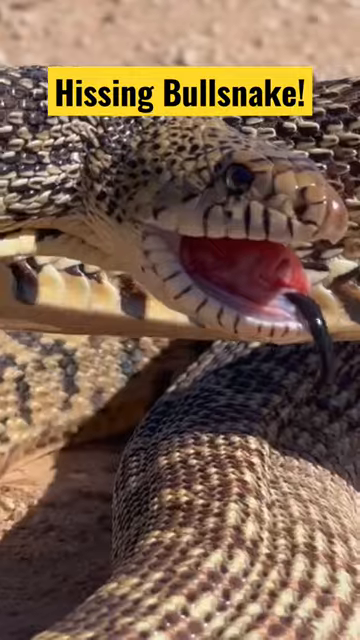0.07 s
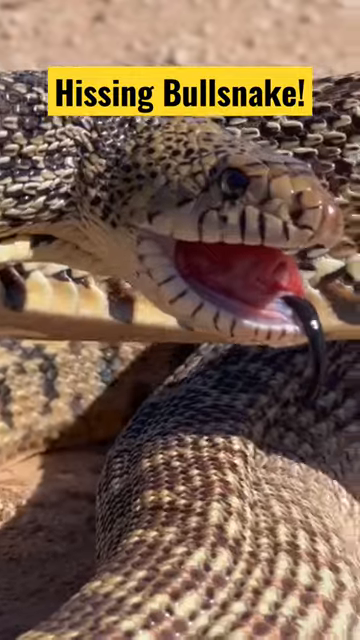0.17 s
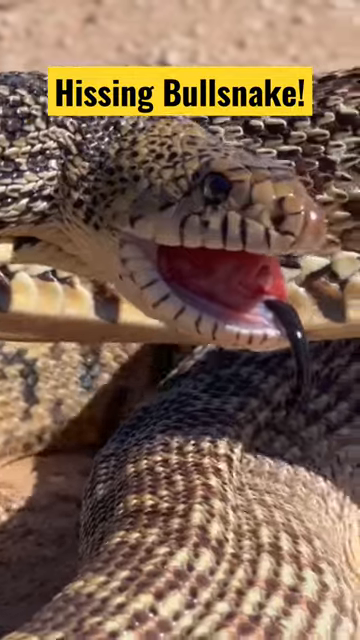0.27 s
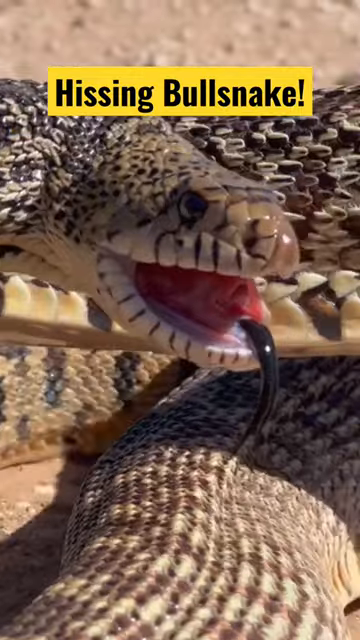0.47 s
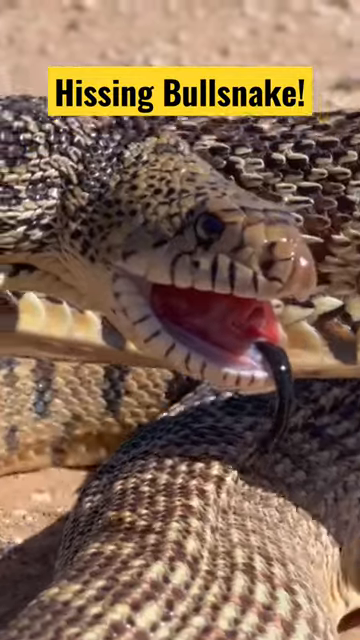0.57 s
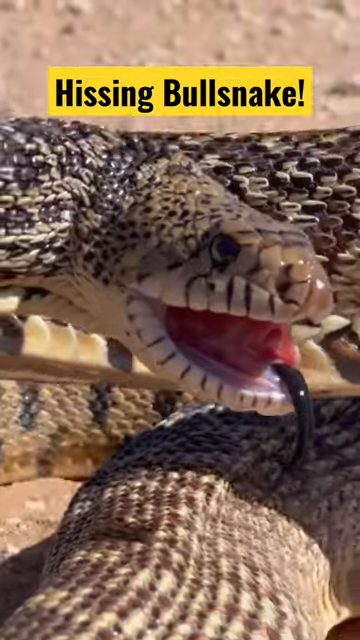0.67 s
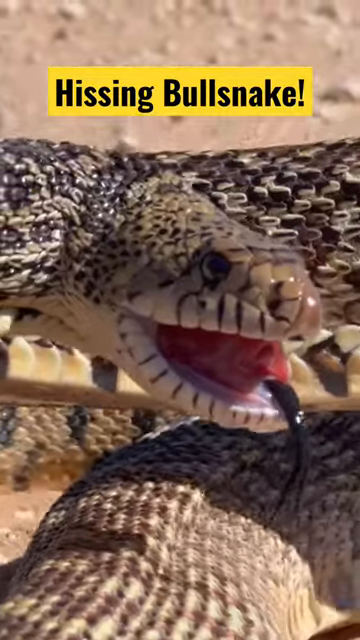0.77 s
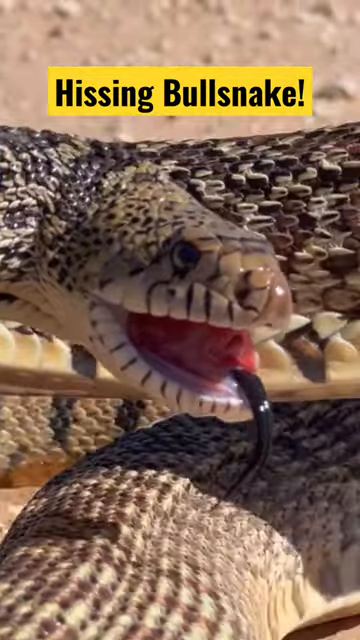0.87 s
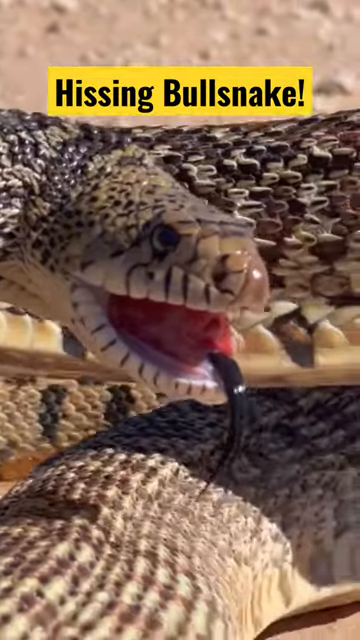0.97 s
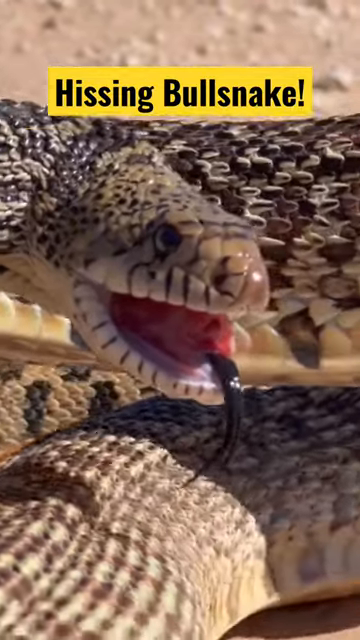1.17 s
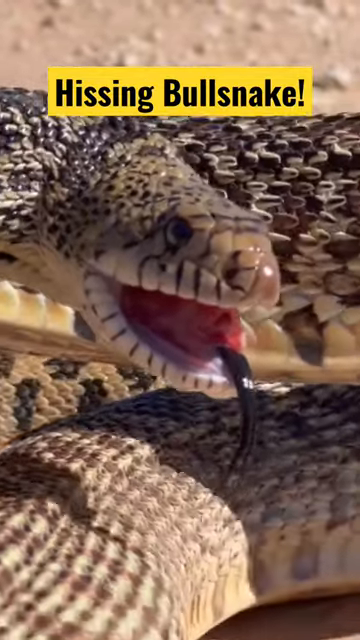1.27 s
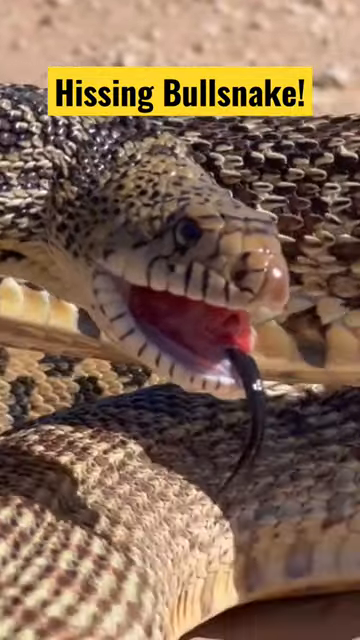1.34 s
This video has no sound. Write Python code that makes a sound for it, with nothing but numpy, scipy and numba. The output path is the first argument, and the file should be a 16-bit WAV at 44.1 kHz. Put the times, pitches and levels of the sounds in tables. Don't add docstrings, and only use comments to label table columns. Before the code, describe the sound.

After a blink of silence, a big snake's harsh, breathy hiss starts abruptly at 0.04 s and holds nearly steady to the end, about 2.8 s, with a rapid rough flutter and slowly shifting mouth tone. Tiny clicks come near 0.7, 1.0, 2.1 and 2.7 s, with faint airy whistles throughout. Very close, dry, outdoors; soft wind rumble swells into low buffets from 2.45 s.

```python
import sys
import numpy as np
from scipy import signal
from scipy.fft import rfft, irfft
from scipy.io import wavfile
from scipy.ndimage import uniform_filter1d, map_coordinates
from numba import njit

SR = 44100
rng = np.random.default_rng(int(sys.argv[2]) if len(sys.argv) > 2 else 0)


def elevation(decibels):
    levels = np.asarray(decibels, float)
    return 10 ** (levels / 20)


def generate_wav(sig):
    pcm = np.round(np.clip(np.atleast_2d(sig).T, -1, 1) * 32767).astype(np.int16)
    wavfile.write(sys.argv[1], SR, pcm)


N = 124803

# time_s, level_db
BREATH_FLOW = [(0.05, -48), (0.439, -49), (0.71, -47), (1.1, -48.5), (1.16, -47), (1.18, -49),
               (1.67, -48.5), (1.84, -49.5), (2.46, -47.5), (2.55, -49.5), (2.83, -49)]
POSTURE_S = [.25, .75, 1.2, 1.45, 1.699, 2.0, 2.35, 2.75]
FLAP_HZ = [55.93, 59.6, 57.04, 59.38, 61.9, 63.36, 65.2, 64.7]
MOUTH_HZ = [(670, 670, 630, 690, 750, 670, 650, 690), (1210, 1210, 1360, 1470, 1600, 1460, 1390, 1480),
            (2170, 2300, 2530, 2560, 2720, 3050, 3300, 3000),
            (3050, 2960, 3300, 2900, 3270, 3880, 4040, 4220),
            (4700, 5300, 4800, 4700, 5000, 4700, 4600, 4400),
            (5800, 5640, 5650, 6100, 6100, 6130, 6450, 6730),
            (6470, 6560, 6950, 6700, 6900, 6960, 7370, 7160),
            (7900, 8400, 8200, 7860, 7800, 8180, 8900, 8800),
            (9400, 9600, 9230, 9150, 8800, 9350, 9600, 9900),
            (10600, 11000, 11800, 11600, 10900, 10700, 10300, 11000),
            (13560, 13800, 14000, 13800, 13800, 13500, 12980, 12980),
            (14600, 14400, 14200, 14950, 18000, 17000, 14800, 14400)]
MOUTH_DB = [(-5.5, -7.5, -4.5, -5, -2.5, -3, -3.5, -4.5), (-3.5, -2, 0, 3, 5, 5, 4, 3),
            (1.5, 2.5, 4.5, 2.5, 0, 0.5, 1, 2), (1, 3.5, -2.5, -8, -3.5, -1, -0.2, -2.5),
            (-3.5, -11, -11, -5.5, -4, -5, -6.3, -8), (2, 2.5, -4, 1, 2.5, 2.5, 1.6, 2.7),
            (1, -3.3, -1.5, 1.5, 1.5, 0.5, -0.5, -2.5), (-0.5, 2.5, 1, 1.1, 1.0, -0.7, 2, -0.3),
            (0.5, 0.5, 1.6, -0.2, -1.3, 1.8, 2.8, -1.5), (-13, -14, -14, -8, -1.5, 0, -1, -1.2),
            (-3.5, -3, -10, -9, -6, -14, -11, -16), (-11, -8, -11, -9, -10.5, -6.5, -10, -11)]
MOUTH_WIDTH_HZ = [370, 1240, 1150, 965, 1530.0, 1350, 1420.0, 1570, 2030, 1100, 1360, 2640.0]
POCKET_HZ = [(866, 800, 760, 750, 870, 800, 830, 850), (1830, 2500, 2150, 2060, 2090, 2380, 2670, 2850),
             (3000, 3000, 3000, 3120, 3230, 3150, 3600, 2880),
             (5280, 5400, 5300, 4100, 5460, 5450, 5500, 5330),
             (6720, 7100, 6800, 6500, 6730, 6460, 6530, 6800),
             (7770, 8000, 8200, 8300, 8310, 8300, 8300, 8300),
             (9970, 10000, 10800, 10700, 11200, 11400, 10600, 11100),
             (12050, 11800, 11700, 12000, 11900, 11000, 11800, 12200)]
POCKET_SHARE = [(0.41, 0.4, 0.38, 0.25, .24, 0.39, 0.44, 0.56),
                (0, 0.12, 0.12, 0.53, 0.75, .67, 0.57, 0.61),
                (0.19, 0.55, 0.42, 0.45, 0.63, 0.48, .05, .05), (0.14, .41, .31, .3, 0.31, .32, 0.33, 0.4),
                (0.067, .22, 0, .36, 0.79, .6, .48, 0.34), (.29, 0, .59, .4, .24, .36, .45, 0.68),
                (0.56, .45, 0.16, .4, .4, .45, .55, .3), (.25, 0.35, 0.39, .3, .2, .25, .3, .3)]
POCKET_WIDTH_HZ = [238, 620, 453, 180.0, 514, 327, 890, 900]
# time_s, centre_hz, share (0-1)
SHADOW = [
    (1.74, 12300, 0),
    (1.8, 12600, .6),
    (1.88, 13400, .5),
    (1.96, 13400, 0),
    (2.12, 13700, 0),
    (2.19, 14200, .8),
    (2.26, 15000, .7),
    (2.31, 15600, 0),
]
ECHO_MS = [
    (1.85, 1.83, 1.8, 1.77, 1.63, 1.65, 1.66, 1.63),
    (3.2, 3.1, 3.1, 2.8, 3.15, 3.15, 3.18, 3.18),
]
ECHO_GAIN = [
    (.06, .08, 0.25, 0.081, 0.11, 0.11, 0.16, 0.067),
    (.12, 0.081, 0.12, 0.09, 0.085, 0.094, 0.14, 0.079),
]
# centre_s, half_length_s, pitch_hz, level_db
WHISTLES = [(.3, .12, 5300, -57.5), (0.7, 0.046, 3050, -62), (0.16, 0.054, 2500, -64),
            (.7, 0.091, 2290, -64), (1, 0.068, 8400, -66), (1.38, 0.036, 2800, -65.5),
            (1.64, 0.025, 2660, -60), (1.65, .1, 6000, -63), (2.283, 0.035, 1700, -58),
            (2.34, 0.068, 3800, -63), (2.443, 0.073, 1700, -64), (2.52, 0.025, 1760, -59.5),
            (2.722, 0.047, 3300, -64), (0.24, 0.13, 1103, -66), (1.83, 0.12, 1140, -66),
            (2.51, 0.13, 1114, -63), (2.33, .09, 4300, -63.5), (2.4, .1, 1540, -62),
            (1.5, 0.066, 2750, -64), (1.143, 0.033, 2650, -63), (1.15, .04, 1670, -62),
            (0.12, 0.067, 3000, -64)]
# start_s, level_db, pitch_hz, ring (cycles)
CLICKS = [
    (.7198, -39, 1500, .8),
    (1.024, -53.5, 420, 4.5),
    (.997, -57, 460, 4),
    (1.005, -50, 900, .8),
    (2.077, -42, 3650, 9),
    (2.69, -43, 3300, 6),
]
# frequency_hz, level_db (per Hz)
WIND_SPECTRUM = [(2.4, -9), (4.0, 15), (19, -1.5), (123, -24.5), (217, -35), (420, -40), (550, -63),
                 (920, -120)]
# time_s, level_db
BREEZE = [(0.04, -46), (0.11, -55.5), (0.23, -51.5), (0.3, -48), (0.36, -46.5), (0.71, -58), (0.77, -49),
          (1.09, -54.5), (1.18, -56), (1.23, -48), (1.7, -54), (1.72, -59), (1.82, -47.5), (2.13, -56),
          (2.26, -53), (2.33, -65.5), (2.36, -42), (2.42, -51)]
# centre_s, height (full scale), half_width_s
BUFFETS = [(.038, .010, .012), (2.455, -.012, .02), (2.520, -.011, .016), (2.568, .029, .011),
           (2.590, .035, .009), (2.683, .006, .004), (2.697, -.022, .020), (2.726, -.040, .0065),
           (2.756, .025, .017), (2.783, -.008, .004), (2.804, .024, .0045), (2.821, -.018, .007)]
# time_s, edge_hz
TOP_EDGE = [(.07, 15740), (.1, 15100), (.15, 15100), (.19, 14620), (.26, 14700), (.3, 15050), (.42, 14850),
            (.48, 15080), (.51, 15600), (.72, 15600), (.75, 15100), (.8, 15400), (.83, 15030), (.9, 15050),
            (.96, 15400), (1.05, 15050), (1.075, 15800), (1.72, 15800), (1.755, 15200), (1.785, 15250),
            (1.82, 15800)]


def rms_one(x):
    return x / np.sqrt(np.mean(x ** 2) + 1e-20)


def over_time(s, values):
    return np.interp(np.arange(N) / SR, s, values)


def bell(centre_s, half_s):
    return np.exp(-.5 * ((np.arange(N) / SR - centre_s) / half_s) ** 2)


def drift(rate_hz):
    r = np.exp(-2 * np.pi * rate_hz / SR)
    noise = rng.standard_normal(N + SR)
    return rms_one(signal.lfilter([1], [1, -2 * r, r * r], noise)[SR:])


def high_pass(x, edge_hz):
    return signal.sosfilt(signal.butter(2, edge_hz, "high", fs=SR, output="sos"), x)


@njit
def resonate(x, cos_w, r):
    y = np.zeros(len(x))
    for i in range(2, len(x)):
        drive = (1 - r * r) / 2 * (x[i] - x[i - 2])
        y[i] = drive + 2 * r * cos_w[i] * y[i - 1] - r * r * y[i - 2]
    return y


def band_around(x, centre_hz, width_hz):
    return resonate(x, np.cos(2 * np.pi * centre_hz / SR), np.exp(-np.pi * width_hz / SR))


def posture_band(x, hz, width_hz):
    return band_around(x, over_time(POSTURE_S, hz), width_hz)


def jet():
    flap_hz = over_time(POSTURE_S, FLAP_HZ) * (1 + .06 * drift(12))
    turns = np.cumsum(flap_hz) / SR
    opening = (.5 + .5 * np.cos(2 * np.pi * turns)) ** 1.5
    depth = np.clip(0.14 * (1 + 0.57 * drift(4.2)), 0, 1)
    puffs_per_s, puff_s, puff_gain = 170, 0.00081, 0.45
    born = (rng.random(N) < puffs_per_s * 2 * opening / SR) * rng.uniform(0.37, 1.66, N)
    puffs = signal.lfilter([puff_gain], [1, -np.exp(-1 / (puff_s * SR))], born)
    sputter_db, swell_db = 1 * drift(310), -0.5 * drift(2.6)
    gate = (1 - depth + depth * opening + puffs) * elevation(sputter_db + swell_db)
    return rms_one(gate * rng.standard_normal(size=(3, N)))


def mouth(air):
    out = np.zeros(N)
    for k, (hz, width_hz, db) in enumerate(zip(MOUTH_HZ, MOUTH_WIDTH_HZ, MOUTH_DB)):
        level_db = over_time(POSTURE_S, db) + 1 * drift(180)
        once = posture_band(air[k % len(air)], hz, width_hz)
        out += elevation(level_db) * posture_band(once, hz, width_hz)
    for hz, width_hz, share in zip(POCKET_HZ, POCKET_WIDTH_HZ, POCKET_SHARE):
        swallowed = np.clip(over_time(POSTURE_S, share), 0, 1)
        out = out - swallowed * posture_band(out, hz, width_hz)
    s, hz, share = np.transpose(SHADOW)
    return out - over_time(s, share) * band_around(out, over_time(s, hz), 900)


def echoes(x):
    bright, out = high_pass(x, 1230), x
    for ms, gain in zip(ECHO_MS, ECHO_GAIN):
        heard_from = np.arange(N) - over_time(POSTURE_S, ms) * SR / 1000
        out = out + over_time(POSTURE_S, gain) * map_coordinates(bright, [heard_from], order=1)
    return out


def hiss():
    out = echoes(high_pass(mouth(jet()), 430))
    steady = out / np.sqrt(uniform_filter1d(out ** 2, size=SR // 4) + 1e-12)
    return elevation(over_time(*np.transpose(BREATH_FLOW))) * steady


def whistles():
    out, air = np.zeros(N), rng.standard_normal(N)
    for s, half_s, hz, db in WHISTLES:
        centre_hz, width_hz = np.full(N, float(hz)), 290
        tone = band_around(band_around(air, centre_hz, width_hz), centre_hz, width_hz)
        out += elevation(db) * rms_one(tone) * bell(s, half_s)
    return out


def clicks():
    t, out = np.arange(N) / SR, np.zeros(N)
    for s, db, hz, cycles in CLICKS:
        fade = np.exp(-np.abs(t - s) * hz / cycles)
        out += elevation(db) * (t > s) * np.sin(2 * np.pi * hz * (t - s)) * fade
    return out


def gust():
    top_hz = 102
    band = signal.butter(2, [0.48 * top_hz, top_hz], "band", fs=SR, output="sos")
    roar = signal.sosfilt(band, rng.standard_normal(N))
    return elevation(-58.5) * rms_one(roar) * bell(2.76, .06)


def buffets():
    return sum(height * bell(s, half_s) for s, height, half_s in BUFFETS)


def wind(start_s):
    hz, t = np.arange(1, N // 2 + 2) * SR / N, np.arange(N) / SR
    at_hz, db = np.transpose(WIND_SPECTRUM)
    shape = elevation(np.interp(np.log(hz), np.log(at_hz), db)) * (hz > 3) * (hz < at_hz[-1])
    air = rfft(rng.standard_normal(N)) * shape
    scale = np.std(irfft(air, N))
    low = 1 / (1 + (hz / 28) ** 4)
    heave = irfft(air * low, N) / scale
    rumble = irfft(air * (1 - low), N) / scale
    heave = heave / (uniform_filter1d(heave ** 2, size=SR // 8) + .05) ** (0.64 / 2)
    rumble = rumble / (uniform_filter1d(rms_one(rumble) ** 2, size=SR // 12) + .05) ** (0.46 / 2)
    breeze_db = 4 + over_time(*np.transpose(BREEZE))
    mean_db = breeze_db.mean()
    rumble = rumble * elevation(mean_db + .5 + 0.28 * (breeze_db - mean_db))
    fade_in = np.clip((t - start_s) / .04, 0, 1)
    calm = fade_in * (1 + 3 / (1 + np.exp((t - 2.42) / 0.034))) / 4
    return heave * elevation(breeze_db) * calm + rumble


def open_air():
    return elevation(-65.5) * rms_one(signal.lfilter([1], [1, -.9], rng.standard_normal(N)))


START_S = .0363


def scene():
    snake = hiss() + whistles() + clicks()
    return (snake + gust() + buffets() + wind(START_S) + open_air())[None]


def low_pass(x, edge_hz):
    return signal.sosfilt(signal.ellip(10, .3, 60, edge_hz, fs=SR, output="sos"), x)


def roll_off(x):
    return signal.sosfilt(signal.butter(12, 15760, fs=SR, output="sos"), x)


def record(dry):
    hz, s, z = signal.stft(low_pass(dry, 15740), SR, nperseg=2048)
    edge_hz = np.interp(s, *np.transpose(TOP_EDGE)) + 100 * rng.standard_normal(len(s))
    cut = signal.istft(z * (hz[:, None] < edge_hz), SR, nperseg=2048)[1][:, :N]
    mix = cut * (np.arange(N) / SR >= START_S)
    return roll_off(mix)


dry = scene()
out = record(dry)
generate_wav(out)
```